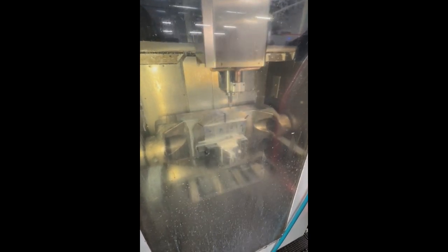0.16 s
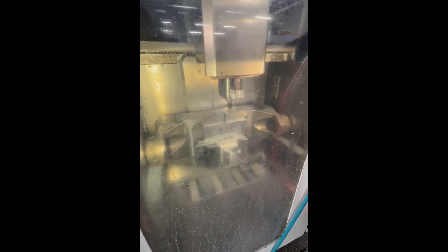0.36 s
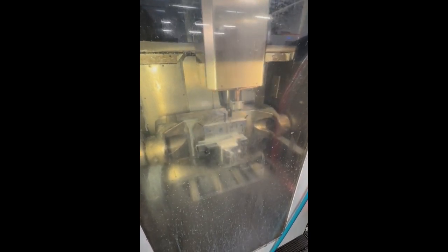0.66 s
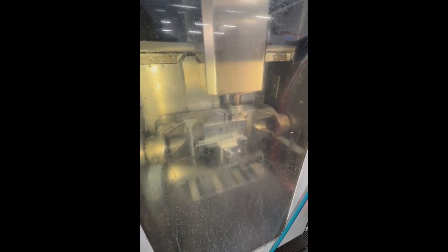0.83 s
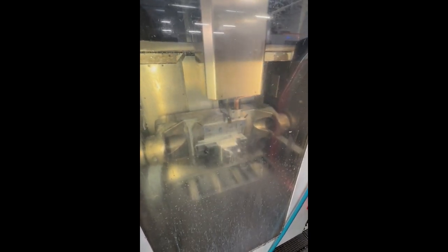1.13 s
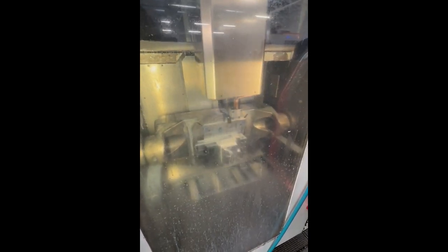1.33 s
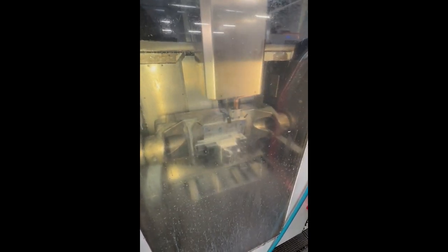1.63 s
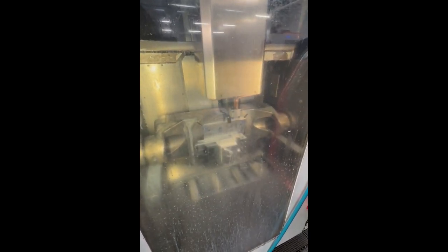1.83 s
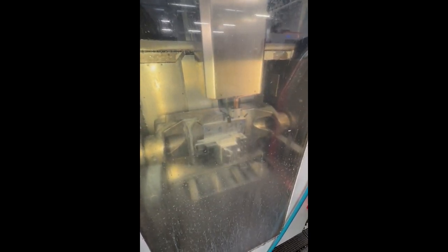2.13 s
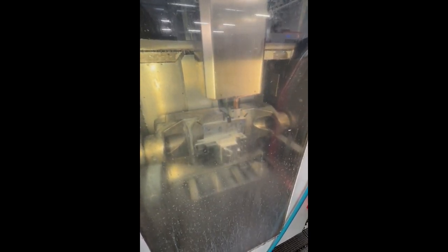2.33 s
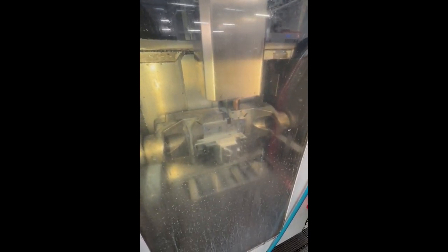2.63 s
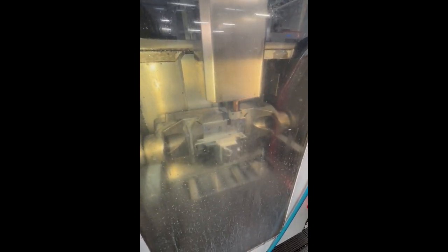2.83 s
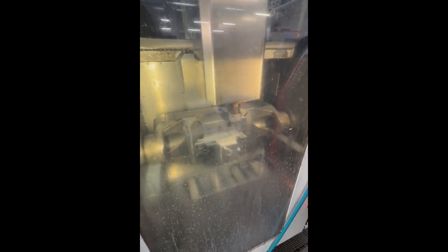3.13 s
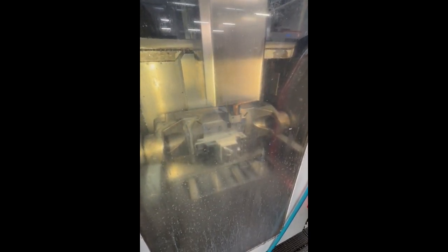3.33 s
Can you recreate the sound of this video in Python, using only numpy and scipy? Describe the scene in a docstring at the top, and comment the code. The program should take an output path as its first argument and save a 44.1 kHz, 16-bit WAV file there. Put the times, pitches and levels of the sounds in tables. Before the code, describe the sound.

Machine tool hum swells and fades in a workshop before a bright air and coolant hiss.

```python
"""A pump drones and swells in a machining centre that idles behind its window in a workshop.
Two spindles, a fan and low hums sit under it as wavering sines, with many faint whines on top.
The hall is shaped noise, rumble and hiss; short tonal blips ring and die.
Near the end an air and coolant jet opens and hisses: noise that starts bright and gains body."""
import sys
import numpy as np
from scipy import signal
from scipy.fft import rfft, irfft, next_fast_len
from scipy.io import wavfile
from scipy.ndimage import uniform_filter1d, map_coordinates

SR = 44100
rng = np.random.default_rng(int(sys.argv[2]) if len(sys.argv) > 2 else 0)


def store_wav(level_fs):
    """Save 16-bit WAV to argv[1]."""
    pcm = np.round(np.clip(np.atleast_2d(level_fs), -1, 1) * 32767)
    wavfile.write(sys.argv[1], SR, pcm.T.astype(np.int16))


N = 153468  # length in samples
SIDES = np.array([[.5], [-.5]])  # shares a left-right difference between the channels


def amp(db):
    """dB to gain."""
    return 10 ** (np.asarray(db) / 20)


def unit(x):
    """Scale to rms 1."""
    return x / np.sqrt(np.mean(x ** 2) + 1e-20)


def along(points, hz):
    """Read (f/Hz, value) points at any frequency, on a log axis."""
    f, v = np.transpose(points)
    return np.interp(np.log(hz + 1), np.log(f + 1), v)


def curves(rows):
    """Automation: one value per sample for each column after t/s."""
    t, *columns = np.transpose(rows)
    return [np.interp(np.arange(N) / SR, t, c) for c in columns]


def wobble(rate):
    """A smooth random curve through rate knots a second."""
    knots = rng.standard_normal(int(N * rate / SR) + 4)
    return map_coordinates(knots, [np.arange(N) * rate / SR])


def filtered(x, response):
    """Filter x by a gain given as a function of f/Hz."""
    m = next_fast_len(N + SR // 2)
    return irfft(rfft(x, m) * response(np.fft.rfftfreq(m, 1 / SR)), m)[..., :N]


def rush(spectrum, side, side_db, patches):
    """Stereo noise with patches of random gain, dips deeper than peaks; its mid has rms 1."""
    z = signal.stft(rng.standard_normal((2, N)), nperseg=1024)[2]
    field = uniform_filter1d(rng.standard_normal(z.shape), 3, axis=1)  # smooth over frequency
    field = uniform_filter1d(field, 5, axis=2)  # smooth over time
    depth_db = along(patches, np.fft.rfftfreq(1024, 1 / SR))[:, None]
    gain = amp(depth_db * np.minimum(unit(field), 1))
    gain /= np.sqrt(np.mean(gain ** 2, axis=2, keepdims=True))  # leaves the spectrum in balance
    pair = signal.istft(z * gain, nperseg=1024)[1][:, :N]
    mid, sid = filtered(pair, lambda hz: amp([along(spectrum, hz), along(side, hz)]))
    return unit(mid) + amp(side_db) * unit(sid) * [[1], [-1]]


def tone(hz, db, pan_db, lead, waver_db, rate, drift):
    """A sine whose level and phase (drift/rad) waver; higher tones waver more apart left and right."""
    apart = min((hz / 450) ** 4, 1) / 2

    def waver():
        return wobble(rate) + apart * np.array([wobble(rate), wobble(rate)])

    phase = 2 * np.pi * (hz * np.arange(N) / SR + rng.random()) + lead * SIDES + drift * waver()
    return np.sqrt(2) * amp(db + pan_db * SIDES + waver_db * waver()) * np.sin(phase)


# Noise colour of the hall, mid then side: f/Hz, relative density/dB per Hz
HALL_MID = [(15, -49.5), (32, -11), (45, -5.5), (76, -9.5), (129, -1), (256, -6), (346, -8), (424, -7),
            (532, -12.5), (604, -12.5), (703, -15), (1080, -17.5), (1160, -15.5), (1260, -17.5),
            (2300, -23.5), (2820, -29.5), (3370, -27.5), (4120, -28), (4920, -29), (6830, -30), (7950, -35),
            (8580, -48), (9250, -38.5), (10500, -103), (13600, -133), (22000, -120)]
HALL_SIDE = [(25, -51), (60, -41), (135, -37.5), (254, -16.5), (430, -5.5), (597, -8), (700, -10),
             (1180, -11), (1750, -22.5), (2270, -11), (3920, -23), (5570, -22.5), (7090, -29), (7800, -27),
             (11200, -35), (11800, -49.5)]
# Random patches in the hall noise: f/Hz, depth/dB
HALL_PATCHES = [(1200, 2), (2800, 6), (7000, 5), (9000, 10)]
# Slow swell, used about its mean and scaled down: t/s, rumble level/dB, deep bass level/dB
RUMBLE_SWELL = [(0, -27.5, -34.5), (.7, -27, -41), (1.2, -30, -31), (1.6, -30, -30.5), (2.2, -32, -38),
                (2.8, -35.5, -34), (3.48, -31.5, -33.5)]
HALL_MID_DB, HALL_SIDE_DB = -28, -32.5  # before the swells


def hall():
    """Rumble and hiss of many machines as shaped noise; bass and rumble swell slowly."""
    x = rush(HALL_MID, HALL_SIDE, HALL_SIDE_DB - HALL_MID_DB, HALL_PATCHES)
    low = filtered(x, lambda hz: 1 / (1 + (hz / 900) ** 2))
    bass = filtered(low, lambda hz: 1 / (1 + (hz / 130) ** 4))
    hiss, rumble = x - low, low - bass
    rumble_db, bass_db = (c - c.mean() for c in curves(RUMBLE_SWELL))
    return amp(HALL_MID_DB) * (hiss + rumble * amp(0.51 * rumble_db) + bass * amp(0.26 * bass_db))


# Low hums, alike in level left and right before they waver: f/Hz, level/dB
LOW_HUMS = [(48, -48), (99, -47), (296, -45)]


def low_hums():
    """Deep steady sines with a slow waver."""
    return sum(tone(hz, db, 0, 0, waver_db=2.5, rate=4.86, drift=0.52) for hz, db in LOW_HUMS)


# Faint whines: f/Hz, level/dB, left over right/dB, left lead/rad
FAINT_WHINES = [(811, -54, 0, 1), (1575, -56, -6, -.6), (1828, -55, -2, 1), (1890, -56, -7, 2),
                (2223, -53, -2, -2), (2404, -54, -2, 2.2), (3365, -56, 0, -1.8), (3607, -60, 1, -1),
                (3774, -59, 4, 1.2), (4200, -59, 3, -.5), (4240, -58, 2, 2.5), (4587, -58, -2, -.6),
                (4651, -61, 4, 1.8), (5254, -61, 2, -1), (5331, -57, 0, 1.2), (5760, -57, -2, -2),
                (6266, -60, -4, -.5), (6975, -60, 0, 0)]
# The clearest whine, level before its swell: f/Hz, level/dB, left over right/dB, left lead/rad
CLEAR_WHINE = (4091, -52, -2, .8)
# Swell of the clearest whine: t/s, level/dB
CLEAR_WHINE_SWELL = [(0, -7), (.92, -7), (1.05, 0), (1.55, -0.5), (1.75, 2.5), (2.3, 3), (2.5, -1),
                     (3.48, -3)]


def whines():
    """High wavering sines; the clearest of them also swells."""
    swell_db, = curves(CLEAR_WHINE_SWELL)
    clear = amp(swell_db) * tone(*CLEAR_WHINE, waver_db=1.8, rate=10, drift=.3)
    return clear + sum(tone(*row, waver_db=2.5, rate=10, drift=.45) for row in FAINT_WHINES)


# Fan orders: multiple of FAN_HZ, level/dB, left over right/dB, left lead/rad
FAN_ORDERS = [(1, -37.5, 0.071, 0), (2, -39.5, .5, 0)]
FAN_HZ = 126.5


def fan():
    """Hum at multiples of the fan's base pitch, with a slow waver."""
    return sum(tone(k * FAN_HZ, *row, waver_db=3.0, rate=5.96, drift=0.44) for k, *row in FAN_ORDERS)


# Orders of each spindle, level before its swell:
# multiple of its base pitch, level/dB, left over right/dB, left lead/rad
NEAR_ORDERS = [(1, -38, 0, 0), (2, -43, 5, .8), (3, -36, -4.5, -1.8), (4, -54, 5, -1.5), (6, -54, -3, .9),
               (7, -53, 0, .8)]
FAR_ORDERS = [(3, -50, -1, -4), (4, -54.5, -1.5, 3), (5, -43.5, -1.5, -1.4), (7, -51.5, -10, 3),
              (9, -52.5, -3, 5), (10, -55.5, 2.5, 4.5)]
# Swell of the spindles: t/s, near level/dB, far level/dB
SPINDLE_SWELL = [(0, 4.5, -3), (.5, 4, -1.5), (1, -2, 2), (1.5, -3, 4.5), (1.9, -1, 4), (2.4, -2, -3.5),
                 (2.9, -2, 1), (3.48, -3, 5)]
NEAR_HZ, FAR_HZ = 200.0, 233.5


def spindles():
    """Two sets of harmonics, near and far, each swelling as a whole with its load."""
    near_db, far_db = curves(SPINDLE_SWELL)
    near = sum(tone(k * NEAR_HZ, *row, waver_db=2.5, rate=12, drift=0.12) for k, *row in NEAR_ORDERS)
    far = sum(tone(k * FAR_HZ, *row, waver_db=2.0, rate=16, drift=0.4) for k, *row in FAR_ORDERS)
    return amp(near_db) * near + amp(far_db) * far


# Short tones, timed near their peak: t/s, f/Hz, peak level/dB, left over right/dB
TONE_BLIPS = [(.24, 685, -35.5, 12), (.74, 366, -29, 5), (0.822, 1177, -33.5, -5.5), (1.14, 1634, -39.5, 0),
              (1.19, 496, -29.5, -8), (1.61, 514, -29.5, 8), (1.66, 849, -33, -6), (2.78, 2073, -35, -3),
              (2.88, 1162, -32.5, -16), (3.031, 1397, -37, -13), (3.3, 690, -35, 2),
              (3.299, 1138, -32.5, -8)]
RISE_S, T60_S = .02, 0.23  # time constant of the rise; time to die by 60 dB


def blips():
    """Short soft sines, each with an exponential rise and decay and a random phase per side."""
    out, t = np.zeros((2, N + SR)), np.arange(SR // 4) / SR
    shape = (1 - np.exp(-t / RISE_S)) * amp(-60 * t / T60_S)
    shape /= shape.max()
    for peak_s, hz, db, pan_db in TONE_BLIPS:
        turn = rng.normal(0, min(hz / 700, 2), (2, 1))
        ring = shape * np.sin(2 * np.pi * hz * t + turn)
        i = round((peak_s - RISE_S) * SR)
        out[:, i:i + len(t)] += amp(db + pan_db * SIDES) * ring
    return out[:, :N]


# Noise colour of the jet, mid then side: f/Hz, relative density/dB per Hz
JET_MID = [(880, -35), (1500, -14), (2550, -5), (2810, -11.5), (3300, -3), (5050, -2), (6550, 0.5),
           (7600, -3.5), (8300, -14), (9290, -6.5), (10200, -10.5), (10700, -51.5), (11500, -100)]
JET_SIDE = [(880, -45), (1500, -13), (1790, -17), (2420, -7), (3950, -11), (4710, -10), (7060, -10.5),
            (7810, -7.5), (9010, -8.5), (11200, -5.5), (14600, -30), (22000, -120)]
# Random patches in the jet noise: f/Hz, depth/dB
JET_PATCHES = [(2000, 3), (7000, 4.5), (9000, 9)]
# Opening of the jet, before flutter: t/s, level/dB, gain of its lower part on top of that/dB
JET_FLOW = [(3.065, -60.5, -21), (3.09, -41.5, -21), (3.108, -32.5, -13), (3.15, -35, -6.5),
            (3.2, -31, -2.5), (3.3, -31, -1.5), (3.44, -31, 7), (3.48, -32, 4)]


def jet():
    """Turbulent noise: the valve opens treble first, the lower part grows, the level flutters."""
    level_db, lower_db = curves(JET_FLOW)
    x = rush(JET_MID, JET_SIDE, 2.5, JET_PATCHES)  # side over mid in dB
    low = filtered(x, lambda hz: 1 / (1 + (hz / 4000) ** 4))
    flutter_db = 0.53 * wobble(25) + 1.06 * wobble(120)  # slower flutter, faster sputter
    return amp(level_db + flutter_db) * (x - low + amp(lower_db) * low)


# Pump orders, level before the swells: multiple of PUMP_HZ, level/dB, left over right/dB, left lead/rad
PUMP_ORDERS = [(1, -25.5, 8, 0.75), (2, -41, -6, 0.2), (3, -48, 2.5, -0.82)]
# Swell of the first order, used relative to its highest point: t/s, level/dB
DRONE_SWELL = [(0, -27.5), (.1, -26), (.65, -26), (.85, -30), (1.03, -43.5), (1.25, -26), (1.42, -27.5),
               (1.54, -39), (1.75, -26), (1.9, -25), (2.33, -29), (2.45, -35.5), (2.7, -44.5),
               (2.97, -41.5), (3.1, -32.5), (3.27, -25), (3.48, -23)]
# Swell of the second order: t/s, level/dB
OVERTONE_SWELL = [(0, 2), (.55, -3), (.7, 6.5), (.8, -0.5), (.96, -7), (1.05, -10.5), (3.1, -13.5),
                  (3.25, -7), (3.48, 1.5)]
PUMP_HZ = 433.4


def pump():
    """A drone of three harmonics: the two lowest swell and fade, the third only wavers."""
    drone_db, = curves(DRONE_SWELL)
    overtone_db, = curves(OVERTONE_SWELL)
    swells = [drone_db - drone_db.max() + 3.13, overtone_db, 0]
    out = 0
    for (k, *row), swell_db in zip(PUMP_ORDERS, swells):
        out = out + amp(swell_db) * tone(k * PUMP_HZ, *row, waver_db=0.48 * k, rate=12, drift=.07 * k)
    return out


def scene():
    """All sources together, background first."""
    return hall() + low_hums() + whines() + fan() + spindles() + blips() + jet() + pump()


LOW_HZ, TOP_HZ = 42, 11750  # bass roll-off and band limit


def record(dry):
    """The microphone loses the deepest bass; nothing is kept above the band limit."""
    return filtered(dry, lambda hz: (hz < TOP_HZ) * hz ** 3 / np.sqrt(hz ** 6 + LOW_HZ ** 6))


dry = scene()
out = record(dry)
store_wav(out)
```